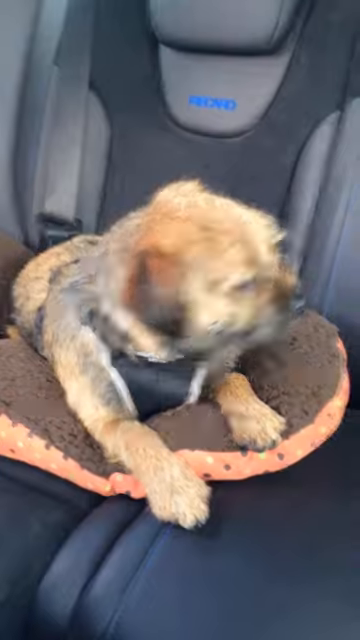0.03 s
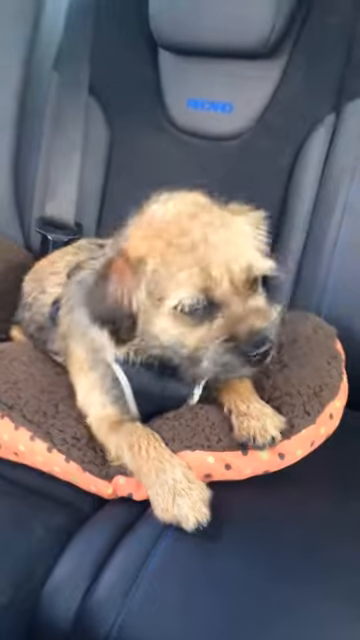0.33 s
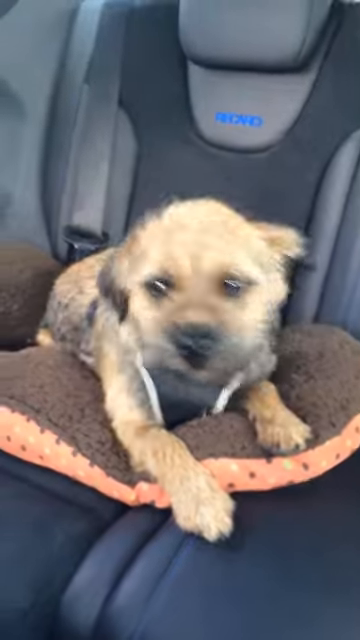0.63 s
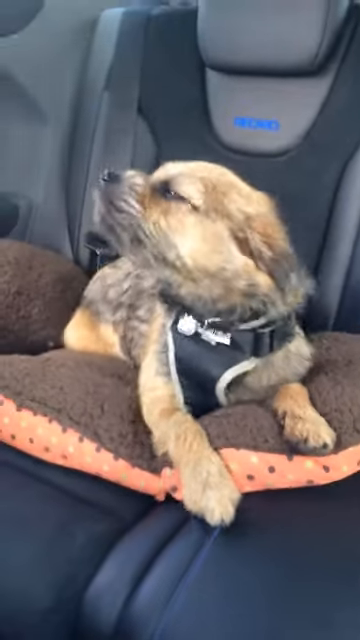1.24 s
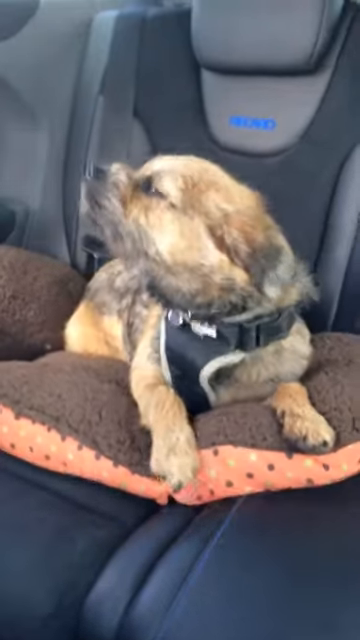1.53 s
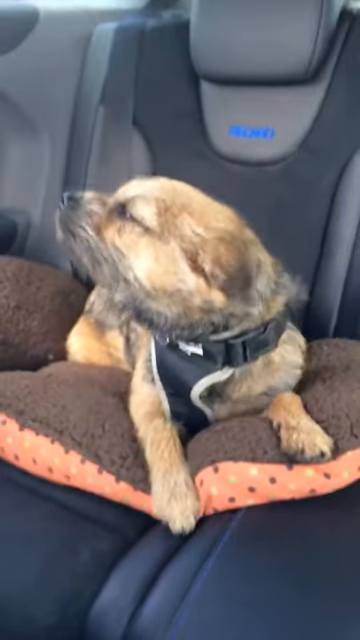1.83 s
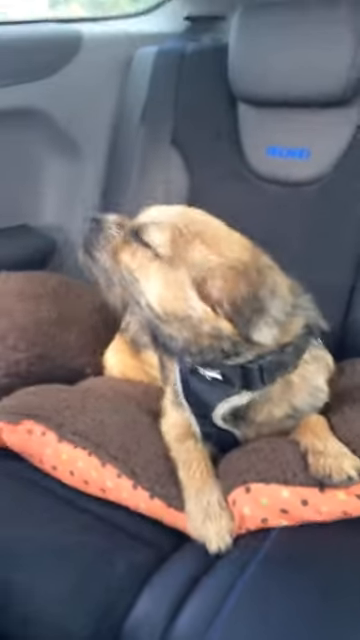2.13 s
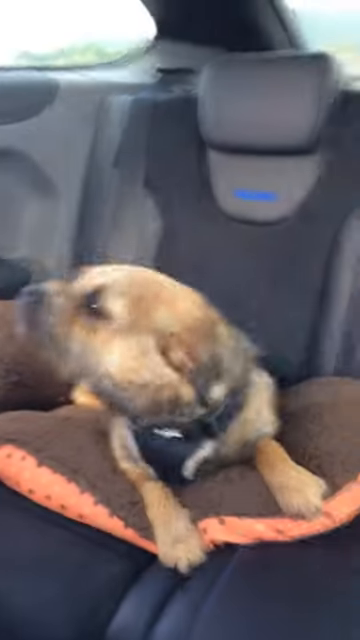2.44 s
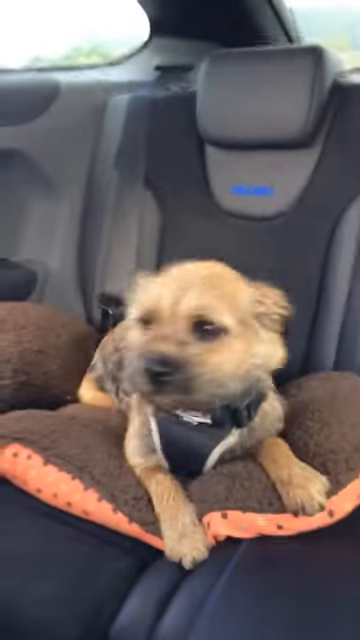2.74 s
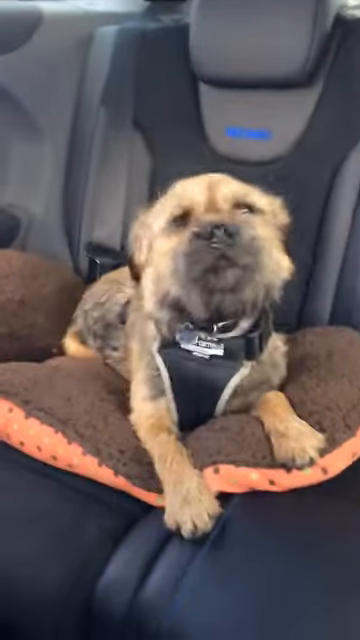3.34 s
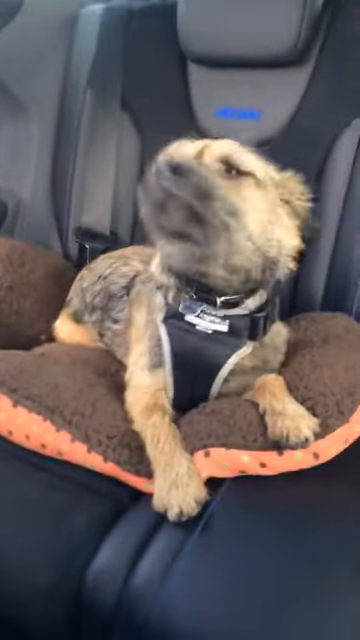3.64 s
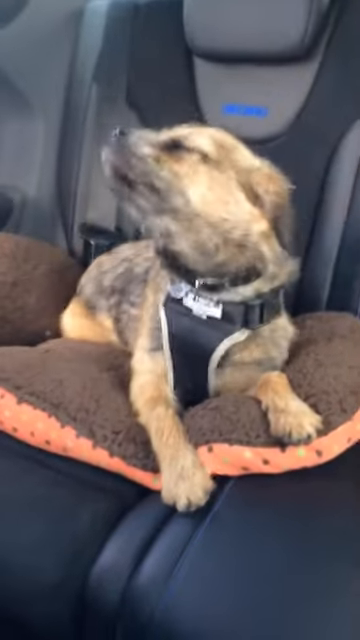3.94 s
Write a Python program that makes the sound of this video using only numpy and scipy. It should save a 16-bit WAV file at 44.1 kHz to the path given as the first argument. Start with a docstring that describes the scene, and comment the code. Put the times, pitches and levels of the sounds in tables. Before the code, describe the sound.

Heard from the seats, a turbocharged car engine accelerates over a bumpy road, with tyre rumble, dull thumps and rattling plastic trim. Past halfway the revs fall, air vents with a brief hiss, and the knocks grow busier.

```python
"""Inside a turbocharged five-cylinder car pulling hard on a bumpy road.
The engine climbs and booms in the cabin. At 2.3 s the throttle closes, the turbo lets its air
out with a hiss, and the engine goes on lower. Bumps make the trim (the cabin's panels) knock
and thump through the floor, while the tyres rumble. A limiter holds the loudest knocks down."""
import sys
import numpy as np
from scipy import signal
from scipy.fft import rfft, irfft
from scipy.io import wavfile
from scipy.ndimage import uniform_filter1d, minimum_filter1d

SR = 44100
rng = np.random.default_rng(int(sys.argv[2]) if len(sys.argv) > 2 else 0)


def output_pcm(signal):
    """Save a mono or channel-first signal as 16-bit PCM at the path in sys.argv[1].

    Samples are clipped to [-1, 1] before scaling.
    """
    pcm = np.clip(np.atleast_2d(signal).T, -1, 1) * 32767
    wavfile.write(sys.argv[1], SR, np.round(pcm).astype(np.int16))


N = 176400
T = np.arange(N) / SR

# The rush of tyres and air; the rattles follow it too. Each row: time in seconds, level in dB.
RUSH_LOUDNESS = [(.1, -45), (.5, -42), (1, -36.5), (1.7, -36), (2.3, -35), (2.8, -33), (3.15, -34),
                 (3.6, -33.5), (4, -32.5)]


def engine():
    """Five firings a cycle make a boom; uneven cylinders add overtones, and burning fuel growls."""
    # Engine speed. Each row: time in seconds, firings per second.
    firing_rate = [(0, 127.5), (.15, 128.7), (.35, 133.4), (.6, 143.6), (.9, 153), (1.2, 161.9),
                   (1.5, 170.8), (1.7, 177.4), (2.05, 187.5), (2.28, 193.5), (2.48, 196.2), (2.7, 181.1),
                   (2.95, 145.7), (3.2, 143.8), (4, 145.5)]
    # The boom at the firing rate. Each row: time in seconds, level in dB.
    boom_level = [(.09, -20.5), (.15, -24.5), (.24, -16), (.36, -15.5), (.53, -21), (.67, -21.5),
                  (.75, -38), (1.1, -29.5), (1.45, -25), (1.76, -18.5), (1.98, -31), (2.12, -18),
                  (2.26, -16.5), (2.35, -32.5), (2.7, -28.5), (3.1, -31.5), (3.5, -27), (4, -36.5)]
    # How hard the engine works. Each row: time in seconds, gain of overtones and growl in dB.
    load = [(.1, -10.5), (.4, -5.5), (.85, -4.5), (1.1, -0.5), (1.5, 0.5), (2, -1), (2.26, 3), (2.38, -9),
            (3.1, -19.5), (4, -15.5)]
    # The overtones. Each row: multiple of the cycle rate, relative level in dB.
    overtones = [(3, -4), (4, 0), (6, -2.5), (7, -2), (8, -8.5), (9, 3), (10, 2), (11, 0.5), (12, -1),
                 (13, -0.5), (14, -1.5), (15, 1), (16, -23.5), (17, -4), (18, 7), (19, 6), (20, -11.5)]
    # How the cabin passes them on. Each row: frequency in Hz, gain in dB.
    cabin = [(70, -38.5), (105, -38), (127, -21.5), (152, -27), (198, -30.5), (225, -38.5), (260, -41.5),
             (290, -31), (312, -31.5), (335, -40), (358, -34), (385, -30), (420, -34), (485, -46),
             (535, -35.5), (600, -52.5), (680, -46.5), (790, -58.5), (1000, -61), (1500, -66)]
    # The growl's tone colour. Each row: frequency in Hz, relative level in dB.
    growl_colour = [(100, -21), (240, 2), (330, 3.5), (430, -1.5), (520, -10.5), (800, -9), (1400, -24.5)]
    firing_hz = in_time(firing_rate)
    cycle_hz = firing_hz / 5
    phase = 2 * np.pi * np.cumsum(cycle_hz * (1 + .0034 * drift(13))) / SR
    firing = 5 * phase
    rasp_db = .18 * (firing_hz - 177.4)  # overtones above 470 Hz grow as the engine speeds up
    tones = np.zeros(N)
    for multiple, db in overtones + [(k, 0) for k in range(21, 37)]:
        hz = multiple * cycle_hz
        rasp_share = np.clip((hz - 470) / cycle_hz, 0, 1)
        level = db + at_hz(cabin, hz) + rasp_share * rasp_db + 2.5 * drift(12.6)
        tones += from_db(level) * np.sin(multiple * phase + rng.uniform(0, 2 * np.pi))
    octave = from_db(12.5 + at_hz(cabin, 2 * firing_hz)) * np.sin(2 * firing)
    boom = from_db(in_time(boom_level) + drift(28)) * (np.sin(firing) + octave)
    growl = from_db(-36.5) * noise(growl_colour, flicker_db=-.5) * (1 + .35 * np.sin(firing))
    roughness = 1 + .2 * drift(45)
    return np.sqrt(2) * boom + from_db(in_time(load)) * (np.sqrt(2) * tones * roughness + growl)


def trim():
    """Loose panels knock, bounce and rattle, and plastic snaps, with a very short cabin echo."""
    # Each row: time in seconds, level in dB, pitch in Hz that rings most, crack in dB above the knock.
    knocks = [(.097, -13, 520, -18.5), (.493, -11, 380, -37), (.515, -7.5, 487, -31),
              (.564, -8, 380.5, -24), (.654, -5, 560, -37), (.696, -14.5, 430, -17), (.786, -8.5, 427, -30),
              (.814, -11.5, 650, -7.5), (.952, -13.5, 530.4, -23), (1.536, -10, 550, -16.5),
              (1.835, -3.5, 650, -12.5), (1.845, -8.5, 700, -23), (1.857, -6, 399.2, -22),
              (1.887, -6, 470, -23), (1.915, -13, 478.3, -14.5), (1.993, -12.5, 470, -23),
              (2.334, -14, 500, -20), (2.629, -16.5, 397.6, -24), (2.802, -15.5, 446, -23),
              (2.814, -10, 360, -25), (2.862, -14, 430, -11), (2.963, -11.5, 660, -8),
              (2.971, -1.5, 701, 1), (2.981, -4.5, 660, -20), (2.997, -3.5, 514.6, -20),
              (3.005, -4, 703, -5.5), (3.036, -10.5, 398.7, -23), (3.107, -12, 550, -24),
              (3.271, -6, 477, -37), (3.352, -5, 500, -15.5), (3.365, -8, 450.5, -11),
              (3.387, -10, 720, -11.5), (3.602, -3.5, 609.6, -4.5), (3.609, -5.5, 588, -15),
              (3.613, -9, 500, -7.5), (3.62, -3.5, 550, -10), (3.629, -4.5, 1200, 4), (3.639, -9, 602, -15),
              (3.672, -9, 627, -25), (3.763, -11, 387, -21), (3.776, -6, 479, -32), (3.783, -1, 540, -22),
              (3.845, -11.5, 442, -28), (3.95, -14.5, 620, -20)]
    # The padded panel's tones. Each row: pitch in Hz, relative level in dB, seconds to fade by 60 dB.
    panel = [(189, -6.5, 0.03), (294, -1, 0.024), (382.3, 1.5, 0.027), (470, 0, 0.024), (581, 2, .019),
             (756, -1.5, 0.016), (922, 0, 0.018), (1170, -3.5, 0.019)]
    # The tones of its hard edge, with the same columns.
    edge = [(1323, 3.5, 0.012), (1598, 3.5, 0.01), (1950, -4.5, .011), (2770, -6.5, 0.0086)]
    # Sharp plastic snaps. Each row: start in seconds, level in dB.
    snaps = [(.096, -44), (2.967, -22), (3.628, -34)]
    # Tone colours of a dry tick and a snap. Each row: frequency in Hz, relative level in dB.
    tick_colour = [(700, 2), (1300, 18), (2800, 4), (3500, -13.5), (5200, -16.5), (9000, -49)]
    snap_colour = [(2000, 5.5), (5300, 1), (7000, -10), (15000, -15)]
    rattles_per_s, soft_crack_db, focus_db_per_octave = 24, -23, 9.5
    out, t = np.zeros(N), T[:SR // 10]
    echo = rng.standard_normal(len(t)) * from_db(-60 * t / .081) * (t > .003)
    tick_noise = noise(tick_colour, flicker_db=-6.5)
    snap_noise = noise(snap_colour, flicker_db=4.5)
    rush_db = in_time(RUSH_LOUDNESS)
    rattle_starts = rng.integers(0, N, int(rattles_per_s * N / SR))
    rattles = [(i / SR, rush_db[i] + 7, 500, soft_crack_db) for i in rattle_starts]
    # The loose panel touches again 9 to 18 ms after each knock.
    bounces = [(s + .009 * (1 + rng.random()), db - 9.5, hz, soft_crack_db) for s, db, hz, _ in knocks]
    for s, db, pitch_hz, crack_db in knocks + bounces + rattles:
        # Tones far from the knock's pitch ring less.
        body = strike([(hz, level - focus_db_per_octave * abs(np.log2(hz / pitch_hz)), fade_s)
                       for hz, level, fade_s in panel])
        tick = from_db(-7 - 60 * t / .025) * np.roll(tick_noise, rng.integers(N))[:len(t)]
        crack = .84 * strike(edge) + tick
        add(out, s - .002028, from_db(db) * body)  # both start early to leave time to rise
        add(out, s - .001282, from_db(db + crack_db) * crack)
    for s, db in snaps:
        add(out, s, from_db(db - 60 * t / .018) * np.roll(snap_noise, rng.integers(N))[:len(t)])
    return out + from_db(-9.5) * signal.fftconvolve(out, echo / np.linalg.norm(echo))[:N]


def thumps():
    """Thumps rock the floor for a few cycles: low ones from bumps through the suspension, higher ones giving
    the trim's knocks their low body."""
    # Each row: start in seconds, peak level in dB, pitch in Hz.
    bumps = [(0.468, -7, 174), (0.522, -5, 158), (0.558, -9.5, 175), (0.635, -14.5, 92), (0.659, -10, 208),
             (0.81, -17, 92), (0.916, -18, 60.3), (1.158, -12, 78), (1.403, -10, 99.07),
             (1.497, -15, 56.44), (2.392, -10, 87), (2.557, -6, 100.3), (2.788, -12, 127.4),
             (2.826, -12, 64.1), (2.865, -9.5, 77), (2.968, -3, 124), (3.028, -10.5, 199),
             (3.206, -16.5, 131), (3.347, -9.5, 151.2), (3.543, -5.5, 136), (3.586, -8.5, 117.2),
             (3.606, -5, 204.5), (3.775, -19, 172), (3.917, -7.5, 129.4)]
    rise_cycles = .76
    out = np.zeros(N)
    for s, db, hz in bumps:
        cycles = hz * T[:SR // 5]
        rise = cycles / rise_cycles
        swell = (rise * np.exp(1 - rise)) ** 2
        add(out, s, from_db(db) * swell * np.sin(2 * np.pi * cycles))
    return out


def road():
    """The tyres make a lumpy rumble under a higher rush of tyres and air."""
    # Tone colours of rumble and rush. Each row: frequency in Hz, relative level in dB.
    rumble_colour = [(18, -13), (30, -8), (52, -1), (90, -0.5), (140, -2), (240, -11.5), (400, -21),
                     (600, -22), (1200, -34.5)]
    rush_colour = [(300, 4.5), (600, 1.5), (950, 2), (1350, -1.5), (1700, -7), (2300, -10), (2900, -20),
                   (3300, -18.5), (5500, -26.5), (8000, -31.5), (15000, -60)]
    # The rumble's loudness. Each row: time in seconds, level in dB.
    rumble_level = [(.1, -27.5), (.6, -26.5), (1.3, -24), (2.3, -23.5), (2.72, -25), (2.86, -20.5),
                    (3.08, -25.5), (3.3, -27), (3.58, -21.5), (3.71, -24.5), (4, -19.5)]
    rumble = from_db(in_time(rumble_level)) * noise(rumble_colour, flicker_db=1)
    rush = from_db(in_time(RUSH_LOUDNESS)) * noise(rush_colour, flicker_db=1.6)
    return rumble + rush


def turbo():
    """Air under pressure hisses and whistles, then vents with a chirp that sinks with the pressure."""
    # The turbo at work. Each row: time in seconds, hiss level in dB, whistle pitch in Hz.
    boost = [(.1, -64.5, 11600), (.45, -60, 12500), (.8, -57, 13080), (1, -55, 13150), (1.3, -55, 13660),
             (2, -56.5, 13560), (2.33, -52, 13450), (2.5, -54, 13010), (3.1, -57, 12030), (4, -53, 12000)]
    # Loudness of the whistle and the venting air. Each row: time in seconds, level in dB.
    whistle_level = [(.1, -84), (.6, -73), (.85, -63), (1.35, -64), (1.65, -69), (2.3, -74), (2.6, -85)]
    vent_level = [(2.3, -85), (2.52, -59), (2.61, -54), (2.66, -46), (2.72, -41.5), (2.79, -51),
                  (2.82, -44), (2.89, -57), (3.05, -83)]
    # Tone colours of the hiss and the venting air. Each row: frequency in Hz, relative level in dB.
    hiss_colour = [(2000, 5), (4000, -7), (5500, 2.5), (8000, -5), (12000, -5.5), (15000, -8.5)]
    vent_colour = [(1500, -1), (2800, 8.5), (4000, 3), (6500, 0.5), (9500, 7.5), (12500, 0), (15000, 3)]
    hiss = from_db(in_time(boost)) * noise(hiss_colour, flicker_db=.9)
    whistle = from_db(in_time(whistle_level)) * breathy_tone(in_time(boost, column=2), width_hz=650)
    chirp_at_s, sink_s, from_hz, to_hz = 2.63, .022, 12300, 9300
    age = np.maximum(T - chirp_at_s, 0)
    chirp_hz = to_hz + (from_hz - to_hz) * np.exp(-age / sink_s)
    opening = np.clip(1 + (T - chirp_at_s) / .014, 0, 1)
    chirp = opening * from_db(-45.5 - 60 * age / .7) * breathy_tone(chirp_hz, width_hz=1500)
    vent = from_db(in_time(vent_level)) * noise(vent_colour, flicker_db=1.5)
    return hiss + whistle + chirp + vent


def strike(tones):
    """Each hit lands on a new spot, so the tones ring a little differently; the peak is one."""
    hz, db, fade_s = np.transpose(tones)[:, :, None]
    strength, detune, lag = rng.standard_normal((3, len(tones), 1))
    t = np.maximum(T[:SR // 10] - .001074 * np.abs(lag), 0)  # each tone starts slightly late
    cycles = hz * np.exp(.066 * detune) * t
    fade = from_db(db + .5 * strength - 60 * t / fade_s)
    rise = 1 - np.exp(-(2 * cycles) ** 2)
    sound = (rise * fade * np.sin(2 * np.pi * cycles) * np.sign(lag)).sum(axis=0)
    return sound / np.abs(sound).max()


def noise(colour, flicker_db):
    """Noise of a given tone colour whose octaves flicker, partly together; its average power is one."""
    hz = np.maximum(np.arange(N // 2 + 1) * SR / N, 1)
    octaves_outside = np.abs(np.log2(hz / np.clip(hz, colour[0][0], colour[-1][0])))
    spectrum = rfft(rng.standard_normal(N)) * from_db(at_hz(colour, hz) - 20 * octaves_outside)
    octave = np.clip(np.log2(hz / 30), 0, 8).astype(int)
    together = .16 * drift(12)
    return power_one(sum(irfft(spectrum * (octave == k), N) * from_db(flicker_db * (together + drift(39)))
                         for k in np.unique(octave)))


def breathy_tone(hz, width_hz):
    """A narrow band of noise around a moving pitch."""
    phase = 2 * np.pi * np.cumsum(hz) / SR
    return drift(width_hz) * np.cos(phase) + drift(width_hz) * np.sin(phase)


def drift(rate_hz):
    """A smooth random wobble with a typical size of one."""
    pole = np.exp(-40 * np.pi * rate_hz / SR)
    steps = rng.standard_normal(N // 20 + 2002)  # one for every 20 samples, plus a run-up
    smooth = signal.lfilter([1], [1, -2 * pole, pole * pole], steps)[2000:]
    return np.interp(np.arange(N) / 20, np.arange(len(smooth)), power_one(smooth))


def from_db(db):
    """Turn decibels into a gain."""
    return 10 ** (np.asarray(db) / 20)


def power_one(x):
    """Scale to an average power of one."""
    return x / np.sqrt(np.mean(x ** 2) + 1e-20)


def in_time(rows, column=1):
    """Join a table's points to get a value at every sample."""
    rows = np.array(rows)
    return np.interp(T, rows[:, 0], rows[:, column])


def at_hz(rows, hz):
    """Read a table's level at any frequency, with octaves evenly spaced."""
    rows = np.array(rows)
    return np.interp(np.log(hz), np.log(rows[:, 0]), rows[:, 1])


def add(out, start_s, sound):
    """Mix a sound in at a given time."""
    i = int(np.clip(start_s * SR, 0, N - 1))
    out[i:i + len(sound)] += sound[:N - i]


def scene():
    """Everything as heard from the seats."""
    return (engine() + road() + turbo() + thumps() + trim())[None]


def record(dry):
    """The microphone opens, a limiter briefly turns loud peaks down, and the highest treble is cut."""
    start_s, ceiling_db, recover_db_per_s, cutoff_hz = .0827, -2.8, 120, 15350
    x = dry[0] * np.clip((T - start_s) / .0029, 0, 1)
    over_db = np.maximum(20 * np.log10(np.abs(x) + 1e-9) - ceiling_db, 0)
    recovery = recover_db_per_s * T
    dip_db = np.maximum.accumulate(over_db + recovery) - recovery
    x = x * from_db(uniform_filter1d(minimum_filter1d(-dip_db, size=65), size=65))
    return signal.sosfilt(signal.ellip(12, .1, 80, cutoff_hz, fs=SR, output="sos"), x)[None]


dry = scene()
out = record(dry)
output_pcm(out)
```